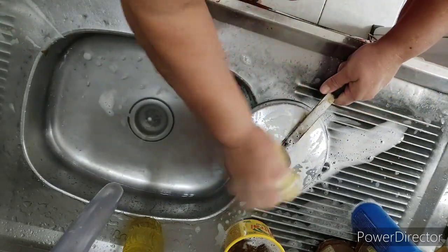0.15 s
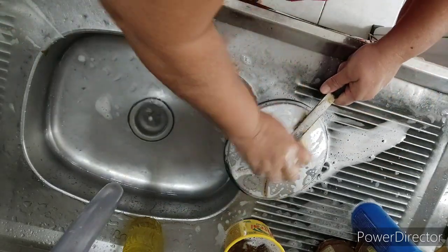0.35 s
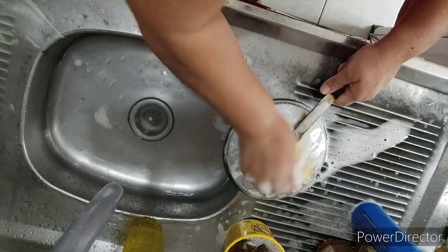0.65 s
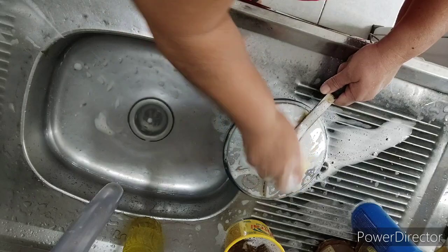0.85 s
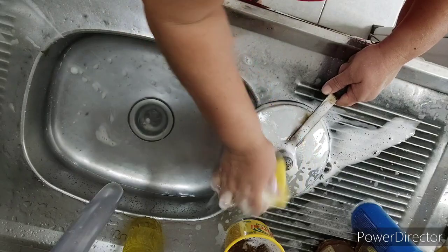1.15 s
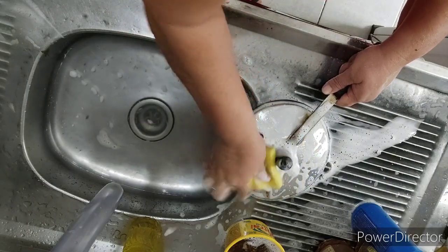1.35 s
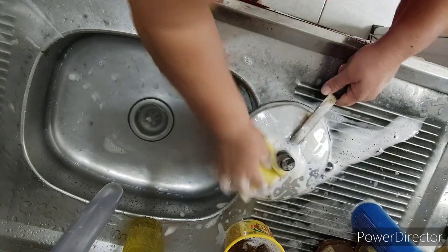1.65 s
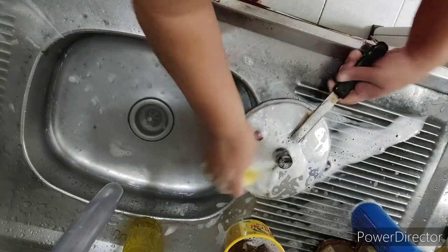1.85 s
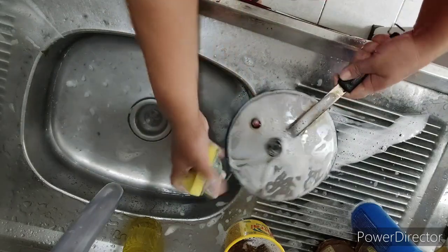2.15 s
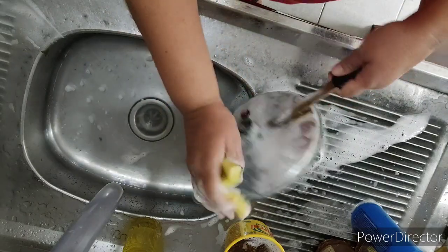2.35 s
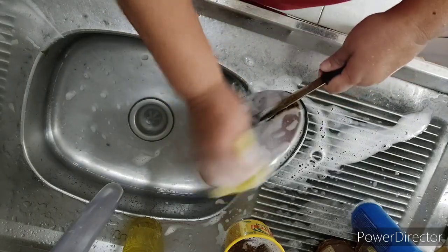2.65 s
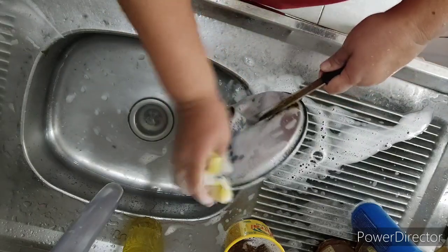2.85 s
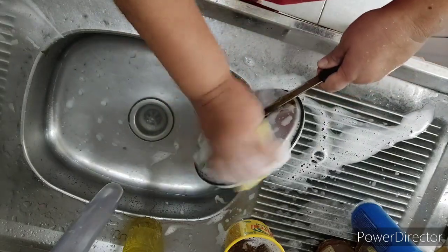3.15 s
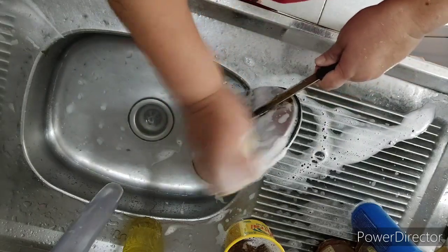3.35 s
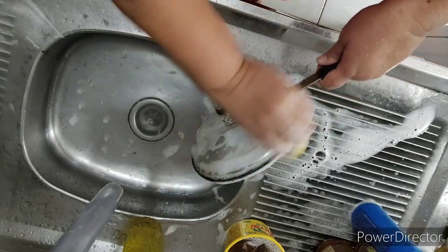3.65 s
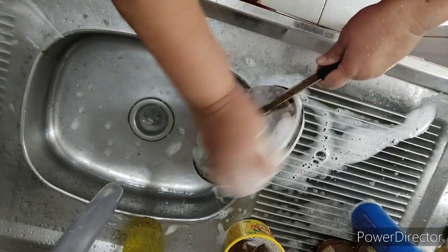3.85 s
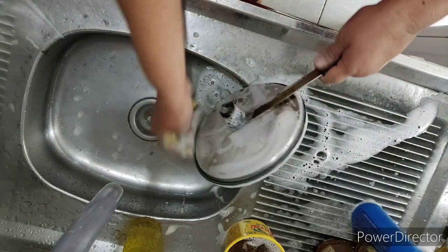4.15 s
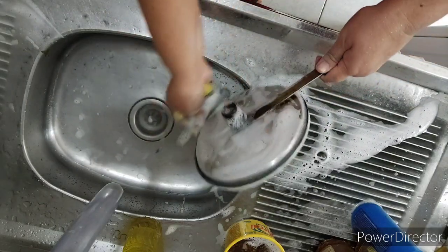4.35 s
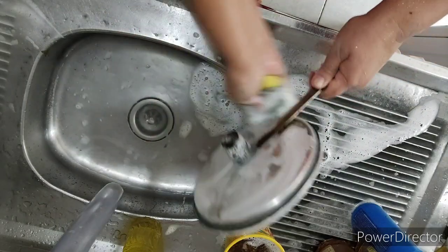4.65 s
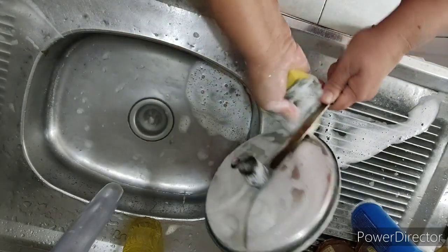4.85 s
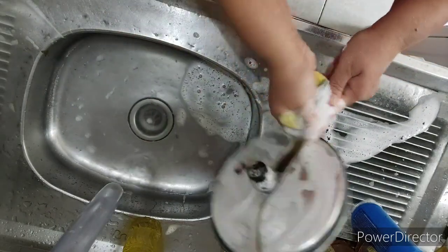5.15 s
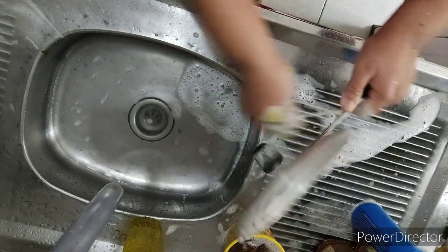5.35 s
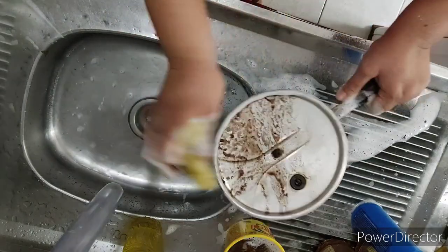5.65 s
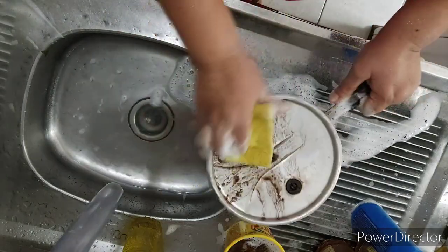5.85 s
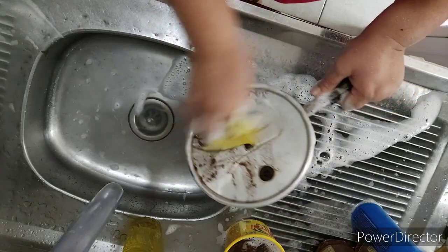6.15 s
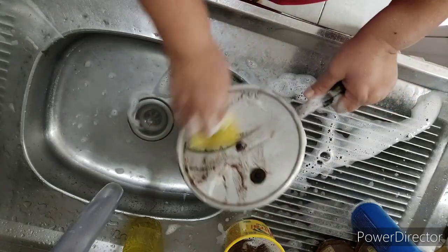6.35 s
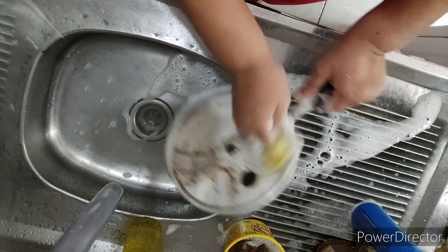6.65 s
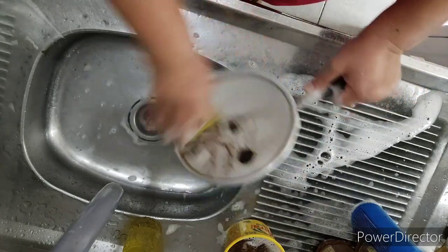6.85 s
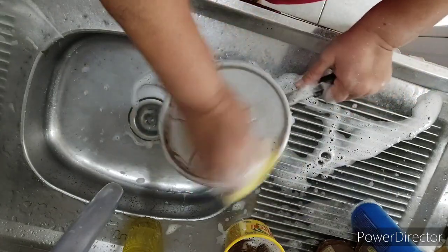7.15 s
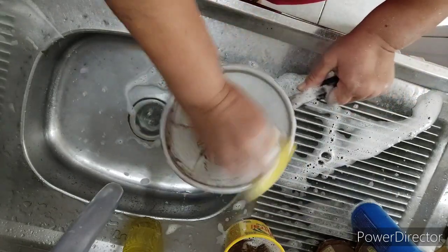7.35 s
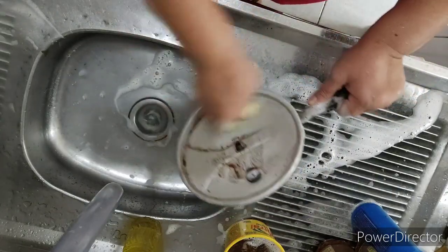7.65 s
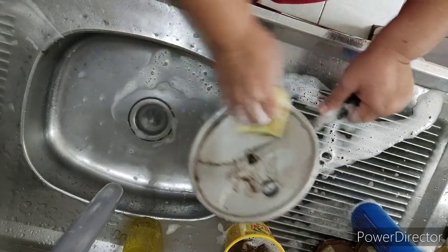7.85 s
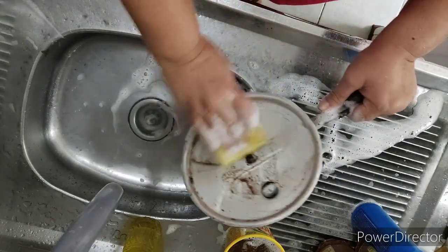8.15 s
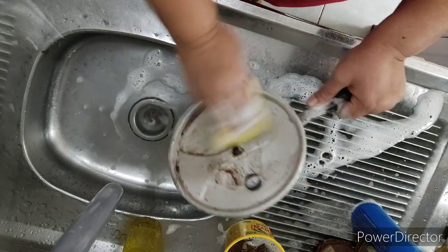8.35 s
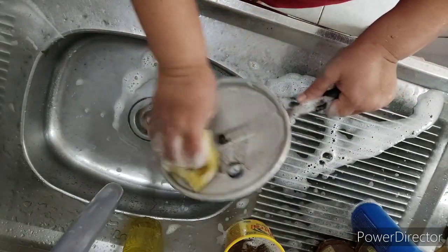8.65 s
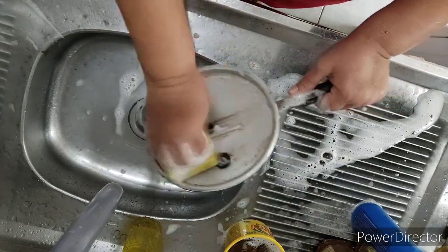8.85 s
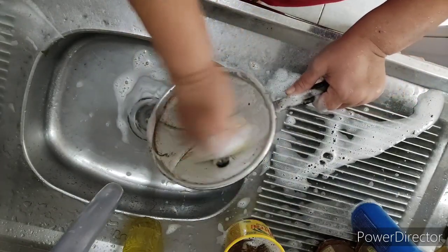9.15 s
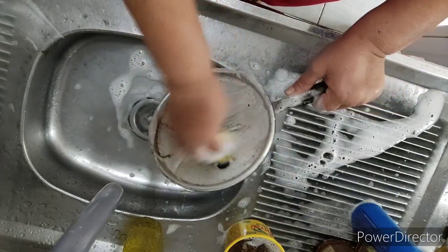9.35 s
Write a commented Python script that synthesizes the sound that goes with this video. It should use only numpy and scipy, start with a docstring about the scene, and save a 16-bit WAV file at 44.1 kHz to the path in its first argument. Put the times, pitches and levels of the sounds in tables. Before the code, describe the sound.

Close to a steel sink in a quiet kitchen, a metal pot lid rocks on the draining board, giving uneven knocks with a short ring while a soapy sponge rubs faintly. The clatter thins out to a few light taps. Just past halfway comes one bright clink as the lid is turned over, then quick, wet sponge swishes with small ticks continue to the end. Faint hum and hiss lie underneath.

```python
"""A quiet kitchen, close to a steel sink, two microphones a few cm apart. Mains hum and faint hiss
lie under it all. At first a metal pot lid rocks on the draining board as a soapy sponge scrubs it,
and each knock sets board and lid ringing. About five and a half seconds in, the lid is turned over
and held up: the grip shortens its ring, suds and fingers tick, and the sponge swishes on to the end."""
import sys
import numpy as np
from scipy import signal
from scipy.fft import rfft, irfft
from scipy.io import wavfile
from scipy.ndimage import uniform_filter1d

SR = 44100
rng = np.random.default_rng(int(sys.argv[2]) if len(sys.argv) > 2 else 0)


def wrap_up_sound(samples):
    """Save the sound to the file named by the first command line argument, as 16-bit audio."""
    columns = np.atleast_2d(samples).T
    # keep every value between -1 and 1, then stretch to whole-number steps
    tamed = np.clip(columns, -1, 1)
    steps = np.round(tamed * 32767).astype(np.int16)
    wavfile.write(sys.argv[1], SR, steps)


N = 419391

# How alike the two microphones hear noise. Each row: frequency in Hz, likeness from 0 to 1.
MIC_LIKENESS = [(60, 0.62), (290, .92), (900, 0.2), (3000, 0.22), (15000, 0.29)]
# Hiss and rumble of the quiet room. Each row: frequency in Hz, relative level in dB.
HISS_SPECTRUM = [(25, -29), (48, -6), (86, -15), (130, -11), (330, -11), (520, -16), (1000, -21.5),
                 (2200, -22), (4000, -25), (9500, -29), (15500, -35)]
# Mains and motor tones. Each row: frequency in Hz, level in dB, seconds between swells,
# time of one crest in seconds, swell depth from 0 to 1.
HUM_TONES = [(59.53, -76, 2.85, 4, .5), (118.6, -70.5, 0.779, 3.61, 0.5), (147.4, -77, 1.9, 2.2, 0.21),
             (175, -82.5, 1.1, 3, 0.1)]
# The kitchen's reverberation. Each row: frequency in Hz, seconds to fall by 60 dB.
ROOM_DECAY = [(200, 0.37), (1000, 0.34), (4000, 0.26), (12000, 0.27)]
# Runs of evenly spaced sponge strokes. Each row: first and last stroke in seconds,
# rough spacing in seconds, level in dB, stroke length in seconds.
STROKE_RUNS = [(.368, .598, .23, -83.5, 0.089), (1.67, 1.892, .226, -77.5, .07),
               (2.435, 2.826, .376, -82.5, 0.059), (3.015, 3.087, .071, -75, 0.032),
               (3.248, 3.47, .113, -81.5, .04), (3.588, 3.842, .127, -83.5, 0.046),
               (4.077, 4.073, .1, -82, 0.053), (4.243, 4.629, .391, -72, 0.24),
               (4.906, 4.904, .1, -83.5, .18), (5.059, 5.474, .415, -76.5, .05),
               (6.156, 6.157, .1, -69, 0.069), (6.312, 6.372, .062, -66, 0.061),
               (6.51, 6.74, .115, -73, 0.099), (6.927, 7.07, .17, -69.5, 0.13),
               (7.21, 7.214, .1, -68, 0.089), (7.354, 7.463, .109, -69.5, 0.067),
               (7.63, 7.756, .128, -73, 0.12), (7.875, 7.876, .1, -71, 0.081),
               (8.015, 8.02, .1, -77.5, 0.17), (8.145, 8.268, .121, -72, 0.092),
               (8.397, 8.711, .155, -70, 0.08), (8.921, 9.472, .11, -67, 0.063)]
# Sponge rubbing on wet metal. Each row: frequency in Hz, relative level in dB.
SWISH_SPECTRUM = [(180, -28), (300, -11), (486, -16.5), (565, -17), (725, -10), (978, -14.5), (1560, -8.5),
                  (6410, -13), (8360, -12), (15000, -22), (16000, -25)]
# Hollow resonances of the lid under the sponge. Each row: centre in Hz, width in Hz, lift in dB.
LID_HOLLOWS = [(790, 63, 10.5), (1610, 290, 3), (9100, 120, 5)]
# Lower tones of the lid face, strongest on the board. Each row: time in seconds, lift in dB.
FACE_LIFT = [(0, 7), (2.8, 10), (3.5, 1), (4.1, 3.5), (4.6, -25), (5.05, 1.5), (6.2, -5.5), (7.3, -11),
             (8.55, -3), (8.75, -0.5)]
# Suds and fingers on the held lid. Each row: start in seconds, level in dB, pitch in Hz.
WET_TICKS = [(5.168, -57, 2280), (5.545, -20.5, 4500), (5.786, -52, 5960), (6.011, -35.5, 3410),
             (6.9, -53.5, 2810), (8.529, -59, 800), (8.65, -52, 1120), (8.842, -41.5, 2670)]
# Modes of the draining board. Each row: frequency in Hz, relative level in dB.
BOARD_MODES = [(160, -11.5), (215, -12.5), (264, -17), (327, -1.5), (430, -28), (459, -10), (498, 1.5),
               (547, -2), (595, -8.5), (634, -7.5), (672, -1.5), (722, -5), (773, -5.5), (818, -2.5),
               (1060, -1.5)]
# Modes of the lid. Each row: frequency in Hz, relative level in dB.
LID_MODES = [(1311, 0.5), (1376, -1.5), (1480, -5), (1581, 4.5), (1690, -12.5), (1740, 1), (2008, -23.5),
             (2240, -1.5), (2460, -2.5), (2530, -2), (2627, -3.5), (2740, -2.5), (2977, -8), (3240, -4),
             (3413, -2), (3607, -9), (3946, -14.5), (4457, -7.5), (4790, -4)]
# The bright crack on top of a knock. Each row: frequency in Hz, relative level in dB.
CRACK_SPECTRUM = [(2060, -29), (3500, -6.5), (6610, -7.5), (9260, -8), (14300, -26), (15000, -20.5),
                  (16000, -57)]
# The lid's knocks. Each row: start in seconds, board level in dB, lid ring and crack
# in dB relative to the board, pitch in Hz around which the lid rings.
LID_KNOCKS = [(0, -38.5, -2.5, -42, 2880), (.092, -26, 11, -12, 2880), (.131, -23, -4, -21.5, 2030),
              (.424, -19, -1.5, -14.5, 2900), (.619, -34.5, -11, -16.5, 2210), (.654, -27, 1, -17, 2780),
              (.678, -16.5, -6, -20, 2120), (.848, -21.5, -11.5, -27.5, 2160),
              (.884, -16.5, -6.5, -19.5, 1900), (.919, -20, -4, -20.5, 2180), (.985, -33, -22, -45, 2300),
              (1.017, -18.5, -4, -17, 2170), (1.085, -9.5, -18.5, -31, 1920),
              (1.244, -27.5, -9.5, -25.5, 1830), (1.271, -20.5, -14.5, -28, 1510),
              (1.297, -21.5, -7, -23, 1730), (1.425, -41.5, -13, -18, 1700),
              (1.452, -24.5, -3.5, -17, 2620), (1.597, -46, -32, -49, 1700),
              (1.774, -40.5, -20.5, -37, 1600), (1.897, -29.5, -15.5, -47, 1600),
              (1.925, -21.5, -12.5, -25, 1760), (1.978, -34, -9, -18.5, 1630),
              (2.011, -8.5, -8.5, -27.5, 1860), (2.034, -12, -0.5, -13.5, 1690),
              (2.062, -20, -5.5, -25.5, 1385), (2.14, -30, -28, -49.5, 1600), (2.213, -6, -13.5, -19, 2540),
              (2.225, -13.5, -1.5, -11.5, 1960), (2.299, -42, -9, -42, 1600),
              (2.582, -44.5, -2.5, -8, 2390), (2.603, -26, -16.5, -24, 2440),
              (2.654, -36.5, -6.5, -22, 1920), (2.724, -32.5, -23.5, -56, 2370),
              (2.756, -45, -12, -50, 2320), (2.937, -39.5, -3, -21, 1350), (2.967, -40.5, -3, -21.5, 1790),
              (3.014, -49, -15, -30, 2130), (3.37, -41.5, -27, -31.5, 1980), (4.034, -47.5, -20, -25, 3020),
              (4.43, -56, -16, -35.5, 2040), (5.49, -60, 11.5, -4, 2730), (5.532, -48.5, 9, -34.5, 1310),
              (5.558, -36.5, 21.5, 12.5, 3170), (5.788, -42, -5, -9, 1360), (5.808, -49.5, 4.5, -42, 1570),
              (5.933, -62, 11.5, -2, 3500), (6.671, -45, -4.5, -34, 1690), (6.949, -34.5, 1, -15.5, 2040),
              (7.009, -41.5, -6.5, -33.5, 1650)]

LEFT_LAG_SAMPLES = -4  # negative: the left microphone hears the lid first
TURN_S = 5.54  # the lid is turned over


def gain_of(db):
    """Decibels to amplitude factor."""
    return 10 ** (np.asarray(db) / 20)


def unit_rms(x):
    """Scales to rms 1."""
    return x / np.sqrt(np.mean(x ** 2) + 1e-20)


def unit_onset(x):
    """Scales so that the first 20 ms have rms 1."""
    return x / np.sqrt(np.mean(x[:, :SR // 50] ** 2))


def curve_at(points, hz):
    """Reads a curve on a log-frequency axis."""
    f, value = np.transpose(points)
    return np.interp(np.log(hz + 1), np.log(f + 1), value)


def wander(t, top_hz):
    """Slow random drift: sines of random phase, rms 1."""
    rates = np.geomspace(.2, top_hz, 24)
    return unit_rms(sum(np.sin(2 * np.pi * (f * t + rng.random())) / np.sqrt(f) for f in rates))


def mic_pair(right, own, hz):
    """Left and right spectra: the left is partly the right, slightly earlier, partly its own noise."""
    alike = curve_at(MIC_LIKENESS, hz)
    shift = np.exp(-2j * np.pi * hz * LEFT_LAG_SAMPLES / SR)
    return np.array([alike * right * shift + np.sqrt(1 - alike ** 2) * own, right])


def stereo_noise(level_db, size, patchy_db):
    """Noise at both microphones, shaped by level_db(hz, t) and by random louder and softer patches."""
    frames = 4 * N // size + 5
    hz = np.fft.rfftfreq(size, 1 / SR)[:, None]
    t = np.arange(frames) * size / 4 / SR
    a, b, c, d, patches = rng.standard_normal((frames, len(hz), 5)).T
    patches = unit_rms(uniform_filter1d(uniform_filter1d(patches, 5, 0), 12, 1))
    spectra = mic_pair(a + 1j * b, c + 1j * d, hz) * gain_of(level_db(hz, t) + patchy_db * patches)
    return signal.istft(spectra, nperseg=size, noverlap=3 * size // 4)[1][:, :N]


def room_tone():
    """Faint hiss under wavering mains and motor tones, which swell and sink in slow beats."""
    t = np.arange(N) / SR
    hiss = unit_rms(stereo_noise(lambda hz, t: curve_at(HISS_SPECTRUM, hz), size=2048, patchy_db=4.0))
    hum = 0
    for hz, db, period_s, crest_s, depth in HUM_TONES:
        level = np.sqrt(2) * gain_of(db + 1.6 * wander(t, 4.4))
        swell = 1 + depth * np.cos(2 * np.pi * (t - crest_s) / period_s)
        hum += level * swell * np.sin(2 * np.pi * (hz * t + 0.036 * wander(t, 15)))
    return gain_of(-65) * hiss + hum


def kitchen_reverb(x):
    """Sparse reflections reach each microphone, every band dying at its own speed."""
    taps = np.zeros((2, SR // 2))
    arrivals = np.arange(200, SR // 2 - 20, 20) + rng.integers(0, 20, (2, (SR // 2 - 201) // 20))
    np.put_along_axis(taps, arrivals, rng.choice([-1., 1.], arrivals.shape), 1)
    hz, t, bands = signal.stft(taps, SR, nperseg=256)
    bands = bands * gain_of(-60 * t / curve_at(ROOM_DECAY, hz)[:, None])
    alike = 1 / (1 + (hz[:, None] / 500) ** 2)  # bass is the same at both microphones
    bands[0] = alike * bands[1] + np.sqrt(1 - alike ** 2) * bands[0]
    tail = signal.istft(bands, SR, nperseg=256)[1]
    return signal.fftconvolve(x, tail / np.linalg.norm(tail[0]), axes=1)[:, :N]


def sponge_strokes():
    """The hand's single strokes, a little uneven, the pull back weaker than the push."""
    pull_db, uneven_db = -0.5, 1
    rows = []
    for first, last, step, db, length in STROKE_RUNS:
        times = np.linspace(first, last, round((last - first) / step) + 1)
        rows += [(s, db + pull_db * (k % 2), length) for k, s in enumerate(times)]
    middle_s, swish_db, length_s = np.transpose(rows)[:, :, None]
    return middle_s, swish_db + uneven_db * rng.standard_normal(middle_s.shape), length_s


def sponge():
    """Soapy friction: each stroke swells and fades, a fine swish with lower tones from the lid face."""
    middle_s, swish_db, length_s = sponge_strokes()
    lift_db = np.interp(middle_s, *np.transpose(FACE_LIFT))

    def level_db(hz, t):
        power = gain_of(2 * swish_db) * np.exp(-np.abs(2 * (t - middle_s) / length_s) ** 2.6) + 1e-14
        stroke_db = 10 * np.log10(power.sum(0))
        face_share = 1 / (1 + (hz / 4500) ** 2)
        face_db = face_share * (power * lift_db).sum(0) / power.sum(0)
        hollow_db = sum(db / (1 + (2 * (hz - f) / width) ** 2) for f, width, db in LID_HOLLOWS)
        suds_crackle_db = 1.4 * rng.exponential(1, len(t))
        return curve_at(SWISH_SPECTRUM, hz) + hollow_db + stroke_db + face_db + suds_crackle_db
    return gain_of([[2.5], [1.5]]) * stereo_noise(level_db, size=512, patchy_db=2.42)


def burst(colour_db, t, quick_s, slow_s, slow_share):
    """Countless small modes blur into coloured noise that drops at once, then dies slowly."""
    hz = np.fft.rfftfreq(len(t), 1 / SR)
    own, right = rfft(rng.standard_normal((2, len(t))))
    noise = irfft(mic_pair(right, own, hz) * gain_of(colour_db(hz + 1)), len(t))
    return unit_rms(noise) * (np.exp(-t / quick_s) + slow_share * np.exp(-t / slow_s)) / 2


def wet_tick(db, centre_hz, length_s=0.0095):
    """Suds or a finger on the lid: a small puff of noise swelling in around one pitch."""
    t = np.arange(4000) / SR
    puff = burst(lambda hz: -6 * (np.log2(hz / centre_hz) / 1.5) ** 2, t, length_s, 0.034, 0.18)
    return gain_of(db) * puff * (t / length_s) ** 2 / (1 + (t / length_s) ** 2)


def metal_ring(modes, centre_hz, octaves, t60, t, blur_db, quick_s):
    """Modes near the struck spot's pitch ring loudest, each with its own phase at each microphone."""
    def colour_db(f):
        bass_loss_db = 10 * np.log10(1 + (110 / f) ** 4)  # thin steel sends out little deep bass
        return -6 * (np.log2(f / centre_hz) / octaves) ** 2 - bass_loss_db
    hz, db = np.transpose(modes)[:, :, None]
    detune, spot, damping, angle = rng.standard_normal((len(modes), 4)).T[:, :, None]
    level = gain_of(db + 2.8 * spot + colour_db(hz) - 60 * t / (t60 * np.exp(damping / 12)))
    beat_rate, beat_start = rng.random((len(modes), 2)).T[:, :, None]
    level *= 1 + 0.67 * np.cos(2 * np.pi * (35 * beat_rate * t + beat_start))  # close mode pairs beat
    phase = 2 * np.pi * hz * (1 + 0.0048 * detune) * t  # all set off together: a sharp first swing
    scatter = 1.6 * angle / (1 + (450 / hz) ** 3)  # bass is nearly alike at both microphones
    left_phase = phase - scatter - 2 * np.pi * hz * LEFT_LAG_SAMPLES / SR
    tones = np.array([(level * np.sin(side)).sum(0) for side in (left_phase, phase)])
    tones *= 0.42 + np.exp(-t / quick_s)  # hand and suds damp the first swing
    blur = burst(colour_db, t, quick_s, slow_s=0.29 * t60, slow_share=0.11)
    return unit_onset(unit_onset(tones) + gain_of(blur_db) * unit_onset(blur))


def contact(start_s, board_db, lid_db, crack_db):
    """How a blow wakes the board: low when soft, higher when firm, shorter with a sharp crack."""
    soft_hz, firm_hz, turned_hz = 313, 566, 665
    firmness = 1 / (1.5 + np.exp(-(board_db + lid_db + 43) / 2))  # 0 to 2/3, rising with the lid's ring
    board_hz = turned_hz if start_s > TURN_S else soft_hz + firmness * (firm_hz - soft_hz)
    firm_octaves = 0.78 * gain_of(0.58 * (board_db + 20.5))  # heavier blows wake more modes
    octaves = firmness * firm_octaves + (1 - firmness) * 0.95
    t60 = 0.14 * gain_of(-0.4721 * (np.clip(crack_db, -40, -10) + 20.5))
    if start_s > TURN_S + .1:
        t60 *= 0.31  # the grip damps the turned lid
    return board_hz, octaves, t60


def lid_knock(start_s, board_db, lid_db, crack_db, lid_hz):
    """One blow and its chatter of rebounds shake board and lid; a short crack tops it."""
    t = np.arange(14000) / SR
    board_hz, octaves, t60 = contact(start_s, board_db, lid_db, crack_db)
    blows = 0.78 * rng.standard_normal(2000) * (rng.random(2000) < 350 / SR)  # 350 rebounds a second
    blows *= np.exp(-t[:2000] / 0.0052)
    blows[0] = 1
    board = metal_ring(BOARD_MODES, board_hz, octaves, t60, t, blur_db=-10.5, quick_s=0.0064)
    lid = metal_ring(LID_MODES, lid_hz, 0.74, 0.52 * t60, t, blur_db=-4.5, quick_s=0.0073)
    tilt = 0.27 * (crack_db + 6.5)  # dB per octave: metal on metal is brighter than a dull knock
    crack = burst(lambda hz: curve_at(CRACK_SPECTRUM, hz) + tilt * np.log2(hz / 7000), t,
                  quick_s=0.0068, slow_s=0.013, slow_share=0.46)
    rise = 1 - np.exp(-t / (0.0018 * gain_of(-.25 * lid_db)))  # dull touches build up more slowly
    sound = board + gain_of(lid_db) * lid + gain_of(crack_db) * unit_onset(crack)
    sound *= rise / abs(board * rise).max()
    return gain_of(board_db) * signal.fftconvolve(sound, blows[None] / np.linalg.norm(blows), axes=1)


def lid_handling():
    """The lid's knocks and wet ticks, each at its time."""
    knocks = [(start_s, lid_knock(start_s, *row)) for start_s, *row in LID_KNOCKS]
    ticks = [(start_s, wet_tick(*row)) for start_s, *row in WET_TICKS]
    track = np.zeros((2, N + SR))
    for start_s, sound in knocks + ticks:
        start = round(start_s * SR)
        track[:, start:start + sound.shape[1]] += sound
    return track[:, :N]


def scene():
    """At the sink: the lid a shade to the right with its reverberation, the sponge, the room tone."""
    lid = lid_handling() * gain_of([[-.5], [.5]])
    return lid + gain_of(-5) * kitchen_reverb(lid) + sponge() + room_tone()


def record(dry):
    """The microphones roll off below 55 Hz, and the band ends at 15.7 kHz."""
    low_cut = signal.sosfilt(signal.butter(3, 55, "high", fs=SR, output="sos"), dry)
    band_limit = signal.firwin(511, 15700, window=("kaiser", 9), fs=SR)
    return signal.oaconvolve(low_cut, band_limit[None], "same")


dry = scene()
out = record(dry)
wrap_up_sound(out)
```